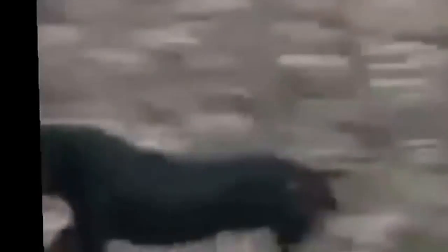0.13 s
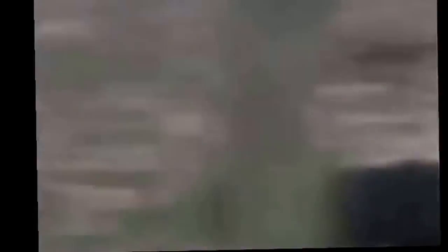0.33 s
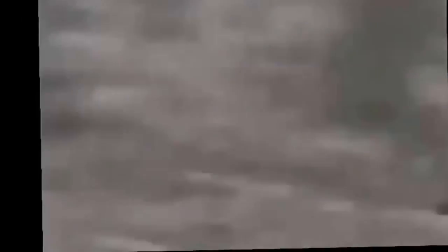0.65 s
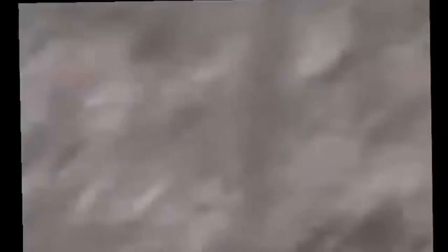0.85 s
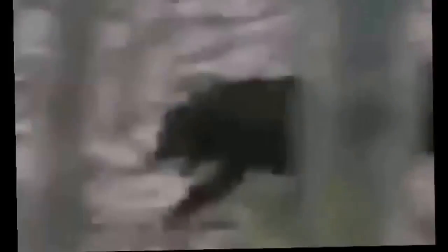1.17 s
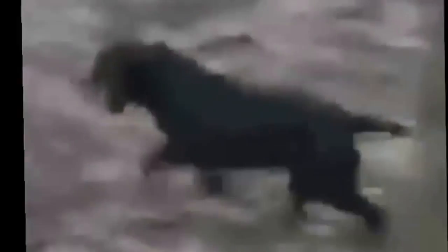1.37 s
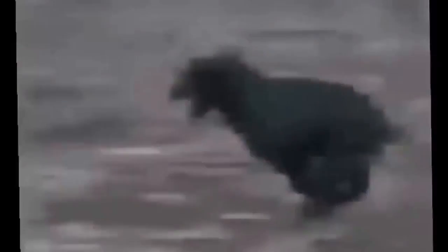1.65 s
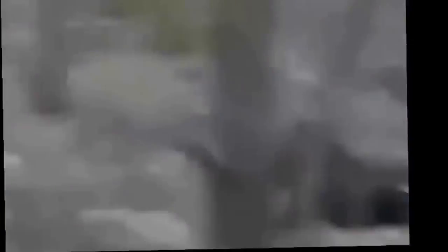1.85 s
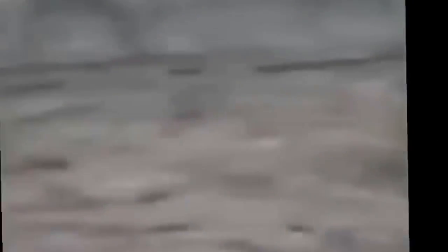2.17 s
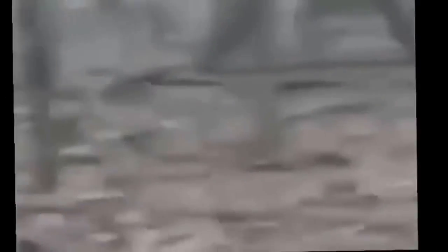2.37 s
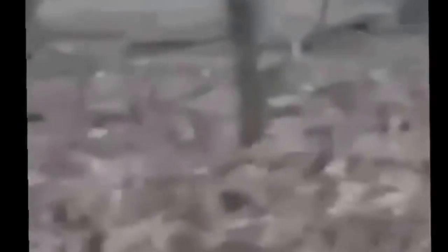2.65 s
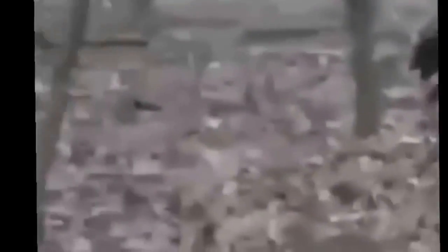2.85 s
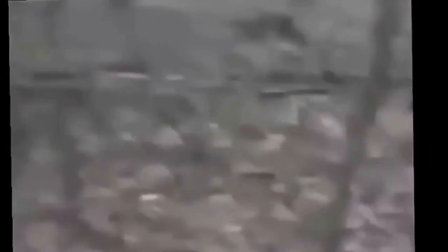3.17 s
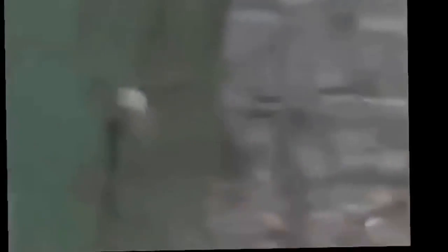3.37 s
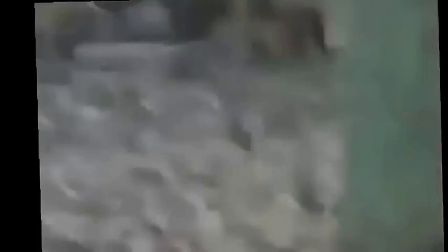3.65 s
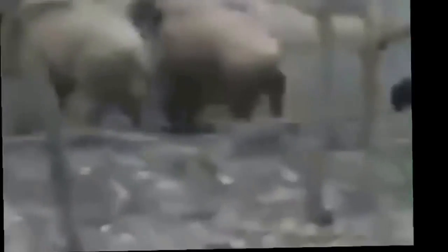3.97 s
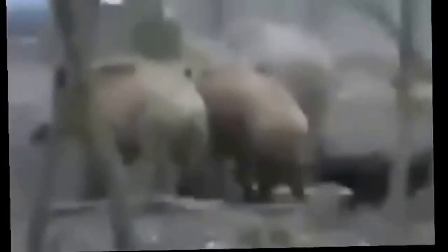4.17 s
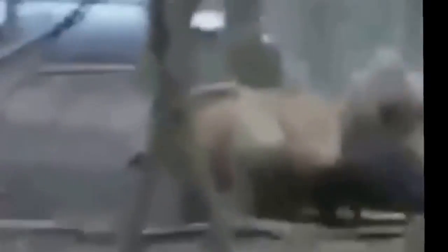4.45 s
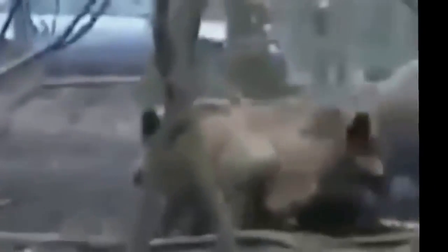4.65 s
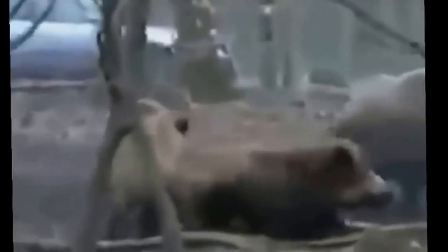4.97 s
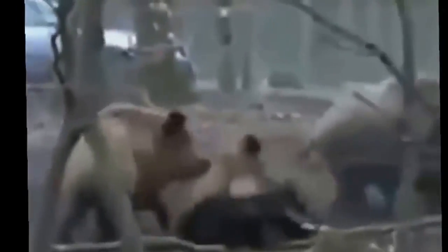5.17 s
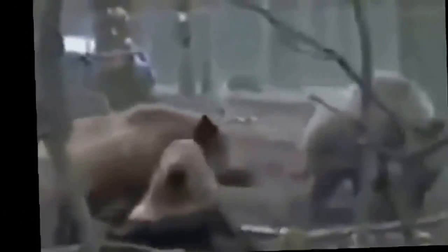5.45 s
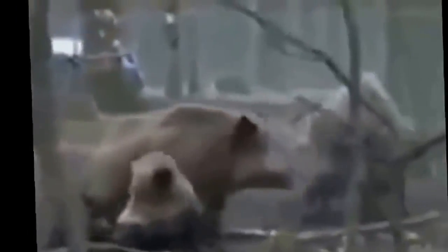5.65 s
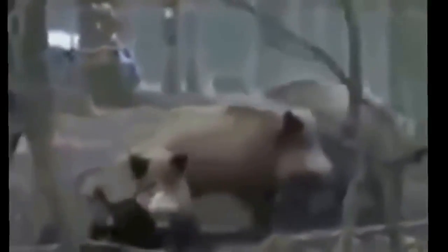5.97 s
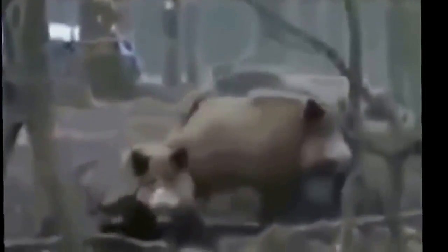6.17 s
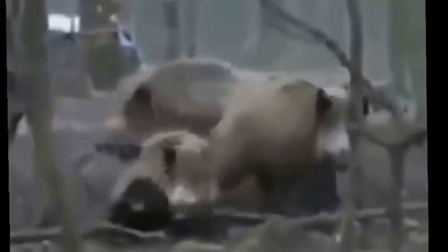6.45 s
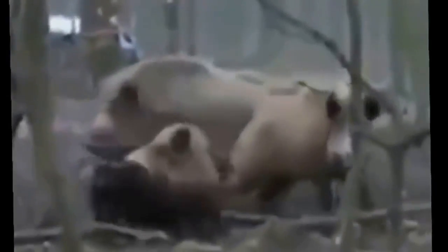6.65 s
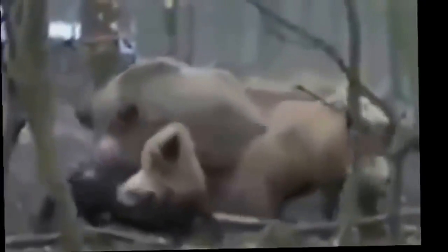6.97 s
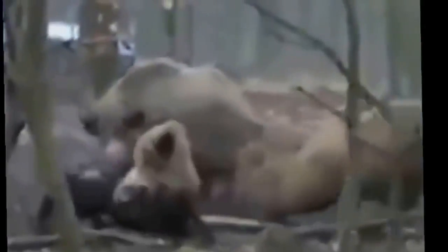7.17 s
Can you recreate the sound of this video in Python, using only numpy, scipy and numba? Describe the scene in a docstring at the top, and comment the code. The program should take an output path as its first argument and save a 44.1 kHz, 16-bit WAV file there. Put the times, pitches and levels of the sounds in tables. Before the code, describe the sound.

Close, rough grunts and sharp barks follow one another quickly as wild boars jostle on dry leaves, over the blurred din of the herd and far, hoarse wails. Midway, distant squeals and more wails echo through the forest, and the near calls thin out briefly. Then a few twigs crack and the grunting and barking grow dense again. The animals are heard from the front, the far ones washed out by the trees.

```python
"""Wild boars run and jostle on dry leaves in a wood.
From the start: near grunts (about 40 throat flaps/s plus fold pulses, ringing throat, mouth and snout),
far hoarse wails, the din of the herd, hooves in the litter. From 0.2 s, hard barks among the flaps.
A twig snaps at 1.2 s. Far squeals at 3-4 s; the wails return at 3.3 s and 5.4 s, washed out by the trees.
Three more twigs snap at 4.8-6 s; grunts and barks go on to the end."""
import sys
import numpy as np
from scipy import signal
from scipy.fft import rfft, irfft
from scipy.io import wavfile
from scipy.ndimage import uniform_filter1d
from numba import njit

SR = 44100
rng = np.random.default_rng(int(sys.argv[2]) if len(sys.argv) > 2 else 0)


def wrap_up_sound(samples):
    """Save the sound to the file named by the first command line argument, as 16-bit audio."""
    columns = np.atleast_2d(samples).T
    # keep every value between -1 and 1, then stretch to whole-number steps
    tamed = np.clip(columns, -1, 1)
    steps = np.round(tamed * 32767).astype(np.int16)
    wavfile.write(sys.argv[1], SR, steps)


N = 322812
TICKS_S = np.arange(0, N / SR, .001)  # clock of the slow controls
CUTOFF_HZ = 6950

# hard barks: t/s, peak/dB, throat re mouth/dB, rasp re mouth/dB, mouth f/Hz, snout f/Hz, rush decay/s
BARKS = [(0.2447, -7.5, -10, -6.5, 1260, 2500, 0.002), (0.527, -19, -6.5, -18.5, 975, 2500, 0.0054),
         (0.796, -10, -16.5, -12, 903, 3140, 0.0057), (.817, -15, -14.5, -14.5, 1099, 2500, 0.0027),
         (.960, -11, -6, 4, 1100, 2220, 0.0052), (1.31, -19.5, -19, -13.5, 986, 2320, 0.0077),
         (1.387, -13.5, -11.5, -6, 1230, 2320, 0.0021), (1.4085, -10.5, -11, -18, 1164, 2280, 0.0031),
         (1.43, -5.5, -38, -18, 1200, 2240, 0.0048), (1.6046, -18.5, -8.5, -14, 722.5, 2050, 0.0072),
         (1.626, -23.5, -13, -25, 728, 2050, 0.00097), (1.8009, -20.5, -6, -27, 1433, 2310, 0.0025),
         (1.829, -16.5, -12, -23.5, 1397, 2240, 0.0058), (2.003, -3.5, -15, -1, 1310, 2290, 0.0046),
         (2.071, -12.5, -11, -7.5, 1408, 3080, 0.004), (2.405, -10, 4.5, 17.5, 1082, 2630, 0.0023),
         (2.45, -19, -19, -12, 955, 3040, 0.0067), (2.4765, -23, -13.5, 0.5, 717.5, 2570, .003),
         (2.658, -16, -13, -26, 1380, 2050, 0.0037), (2.685, -11, -15.5, -1, 1154, 2140, 0.0033),
         (2.801, -19, -10, -15.5, 1100, 2340, 0.0049), (2.826, -17, -11, -4.5, 1050, 2490, 0.0042),
         (2.923, -17, -11, -16, 1100, 2260, 0.011), (3.089, -16.5, -13, -3.5, 1208, 2360, 0.00072),
         (3.1142, -4.5, 0, 17.5, 1246, 2359, 0.0022), (3.286, -8.5, -7, -20, 1205, 1996, 0.002),
         (3.894, -9, -7.5, 4, 1200, 2189, 0.0022), (4.3784, -13, -14.5, -1, 900, 2401, 0.005),
         (4.403, -13.5, -11.5, -3, 1450, 2947, 0.0035), (4.409, -9, -12, -31, 1220, 2780, 0.0051),
         (4.808, -14.5, -2.5, 2, 1546, 2500, 0.0039), (4.83, -5, -9, 0, 1597, 2670, .004),
         (4.849, -14, -11, -11.5, 1485, 2500, 0.0022), (5.068, -11.5, -18.5, -23, 1278, 3190, 0.0051),
         (5.176, -14.5, -8, 0, 1500, 3000, 0.0033), (5.191, -9.5, -3.5, 7.5, 1453, 2150, 0.009),
         (5.2881, 2, -15.5, -7.5, 1582, 3442, 0.0012), (5.3127, -10, -12, -9.5, 1685, 3210, 0.0025),
         (5.332, -13, -13, -13, 1450, 3000, 0.0037), (5.485, -5, -1.5, -36, 1359, 2050, 0.0019),
         (5.729, -9, -35.5, -23, 986, 2213, .002), (5.736, 0.5, -10, 7.5, 1142, 2160, 0.00055),
         (6.041, -12, -5.5, -2, 1030, 3464, 0.0044), (6.085, -9, -8, -23, 850, 2766, 0.0035),
         (6.134, -13.5, -14.5, -6, 1211, 2240, 0.007), (6.2225, -11.5, -12, -15.5, 1392, 2400, 0.0031),
         (6.2406, -8.5, -18.5, -14, 1320, 2260, 0.0065), (6.264, -8.5, -6, -5.5, 1372, 2050, 0.0018),
         (6.283, -13.5, -9, -16, 897, 2320, 0.0069), (6.402, -12.5, -12, 13, 1126, 2220, 0.002),
         (6.6507, -3.5, -13, 8, 1613, 2855, 0.0036), (6.676, -4.5, -5, 7.5, 1235, 2500, 0.002206),
         (6.705, -16, -5, -17, 1157, 2500, .004), (6.833, -10.5, -18, -3.5, 1100, 3158, 0.0095),
         (6.8554, -6.5, -7.5, -15, 1822, 2007, 0.0096), (6.921, -6.5, -9, -20, 1003, 2050, 0.00091),
         (7.1266, -7, -12, -27, 1398, 2480, 0.0033), (7.1754, -1, -13.5, -7, 1412, 2360, 0.00077)]


def from_db(db):
    """Decibels to gain."""
    return 10 ** (np.asarray(db) / 20)


def unit_rms(x):
    """Scale to unit power."""
    return x / np.sqrt(np.mean(x ** 2) + 1e-20)


def steady(x, size=2200):
    """Hold unit power, averaged over a few flaps."""
    power = uniform_filter1d(uniform_filter1d(x * x, size), size // 2)
    return x / np.sqrt(np.maximum(power, 1e-6 * np.mean(x * x)))


def per_sample(times_s, *curves):
    """Interpolate curves to every sample."""
    return [np.interp(np.arange(N) / SR, times_s, curve) for curve in curves]


def drift(rate_hz):
    """Smooth random curve, spread about 1."""
    knots = rng.standard_normal(4000)
    return 1.2 * np.interp(np.arange(N) / SR * rate_hz, np.arange(len(knots)), knots)


def cut(x, hz, kind, order=2):
    """Butterworth filter."""
    return signal.sosfilt(signal.butter(order, hz, kind, fs=SR, output="sos"), x + 1e-18)


def lag(x, decay_s):
    """Give each click an exponential tail."""
    return signal.lfilter([1], [1, -np.exp(-1 / (decay_s * SR))], x + 1e-18)


def colour(x, spectrum):
    """Apply a smooth spectrum with rows f/Hz, gain/dB."""
    hz, db = np.transpose(spectrum)
    bins_hz = np.linspace(1, SR / 2, x.shape[-1] // 2 + 1)
    return irfft(rfft(x) * from_db(np.interp(np.log(bins_hz), np.log(hz), db)), x.shape[-1])


def whiten(x):
    """Flatten the spectrum, keep the phase."""
    return irfft(np.exp(1j * np.angle(rfft(x))))


def resonate(x, hz, width_hz):
    """One resonance, unit peak gain."""
    r = np.exp(-np.pi * width_hz / SR)
    poles = [1, -2 * r * np.cos(2 * np.pi * hz / SR), r * r]
    return signal.lfilter(np.array([1, 0, -1]) * (1 - r * r) / 2, poles, x + 1e-18)


def tract(x, modes):
    """Parallel resonances of alternating sign, rows f/Hz, width/Hz, gain/dB."""
    return sum((-1) ** k * from_db(db) * resonate(x, hz, width_hz)
               for k, (hz, width_hz, db) in enumerate(modes))


@njit
def glide(x, hz, width_hz):
    """Resonance with a moving centre."""
    out, r = np.zeros(len(x)), np.exp(-np.pi * width_hz / SR)
    for i in range(2, len(x)):
        drive = (1 - r * r) / 2 * (x[i] - x[i - 2])
        out[i] = drive + 2 * r * np.cos(2 * np.pi * hz[i] / SR) * out[i - 1] - r * r * out[i - 2]
    return out


def formant(x, hz, width_hz):
    """Three resonances in series, fixed or moving, at steady power."""
    for _ in range(3):
        x = glide(x, hz * np.ones(N), width_hz)
    return steady(x)


def efforts(calls, release_db_per_s, swell_db=16.5, sag_db_per_s=25, fade_in_s=0.01032):
    """Gain of each call per tick: swell, sagging hold, release."""
    start_s, attack_s, hold_s = np.transpose(calls)[:3, :, None]
    past_peak_s = TICKS_S - start_s - attack_s
    db = swell_db * np.clip(past_peak_s / attack_s, -1, 0)
    db -= sag_db_per_s * np.maximum(past_peak_s, 0)
    db -= release_db_per_s * np.maximum(past_peak_s - hold_s, 0)
    return from_db(db) * np.clip((TICKS_S - start_s) / fade_in_s, 0, 1)


def leading(effort, values):
    """Value of the strongest call per tick, blended in overlaps."""
    return np.average(values * np.ones_like(effort), axis=0, weights=effort ** 4 + 1e-30)


def grunt_controls():
    """Effort drives throat, mouth and rasp gains; pitch and mouth resonance slide in each grunt."""
    # grunts: t/s, attack/s, hold/s, throat/dB, mouth/dB, rasp/dB, edge re rasp/dB, clearness/0-1,
    # start pitch/Hz, end pitch/Hz, mouth start f/Hz, mouth end f/Hz
    calls = [ (0, .014, 0.064, -24, -30, -38, -10.5, 0.45, 248.2, 224.2, 866, 985),
             (0.198, 0.04, .018, -15, -26.5, -23, -12.5, 0.84, 250.1, 262.2, 1023, 890),
             (0.35, 0.027, 0.054, -26.5, -24, -34, -2, 0.48, 215.2, 222, 733, 825),
             (.483, 0.03, 0.063, -25, -36.5, -35.5, -6.5, 0.52, 224, 262.3, 920, 880),
             (0.771, 0.019, 0.066, -23.5, -31.5, -35, -16.5, 0.63, 255.6, 226.5, 880, 800),
             (0.899, 0.047, 0.055, -22.5, -26.5, -31.5, -10.5, 0.55, 255, 245, 1255, 1120),
             (0.995, 0.034, 0.086, -23, -28, -31.5, -11.5, 0.45, 280, 230, 896, 650),
             (1.259, 0.031, 0.051, -25.5, -33, -34, -3.5, 0.5, 222, 228.3, 560, 520),
             (1.348, .042, 0.032, -20.5, -24.5, -30.5, -8, 0.81, 230.7, 272, 1160, 1231),
             (1.407, 0.027, 0.022, -20.5, -41.5, -34.5, -7, 0.93, 293, 312.3, 1220, 1103),
             (1.567, 0.036, 0.079, -26, -28, -37, -2, 0.36, 237.4, 225.2, 778, 635),
             (1.684, 0.029, .05, -25.5, -35, -43, -5.5, 0.51, 229.8, 261.7, 850, 999),
             (1.774, 0.029, 0.041, -26, -27, -32.5, -8, 0.54, 290, 234.7, 1240, 700),
             (1.965, 0.0093, .03, -24, -37, -32, -17.5, .9, 351, 320.7, 1334, 1349),
             (1.997, .02, 0.091, -21, -26, -37, -4.5, 0.79, 312, 255.3, 1056, 1325),
             (2.122, .058, .058, -22.5, -30, -35.5, -6.5, 0.7, 245, 223.5, 720, 508.7),
             (2.339, 0.038, .035, -28.5, -38, -34, -9, 0.66, 234.7, 210.5, 1130, 928),
             (2.413, 0.024, .055, -27, -28.5, -34, -4.5, 0.62, 212, 225.3, 857, 561),
             (2.621, 0.034, 0.047, -31, -33, -31.5, -2.5, 0.57, 217.9, 238.8, 1257, 1320),
             (2.706, 0.013, .062, -21, -27, -38, -13.5, .9, 244.1, 234.1, 641.5, 591.4),
             (2.791, 0.018, 0.06, -29.5, -39, -40, -7.5, 0.58, 251, 239.8, 1134, 900),
             (2.88, 0.037, 0.026, -28, -34, -33.5, -13.5, 0.57, 260, 225.7, 1260, 895),
             (3.046, 0.052, 0.019, -26.5, -26, -47, -14.5, 0.5, 255, 250.4, 1130, 1270),
             (3.234, 0.04, 0.069, -26.5, -27, -33.5, -10, 0.44, 264.1, 245.9, 1220, 1090),
             (3.516, 0.036, 0.049, -28.5, -29, -34, -7, .75, 251.6, 256, 985, 956),
             (3.679, .028, 0.045, -27.5, -30.5, -43.5, -11.5, 0.71, 194.6, 215, 713, 800),
             (3.825, 0.022, .066, -24.5, -24.5, -28, -1, .75, 345, 280, 987, 1182),
             (3.925, 0.021, .05, -34.5, -33, -38, -12, 0.59, 264, 231.5, 1030, 891),
             (4.353, 0.035, 0.034, -29, -26.5, -28.5, -9, 0.43, 280.4, 242.6, 803, 1158),
             (4.803, 0.024, 0.033, -25, -23, -31.5, 1.5, 0.53, 352.2, 291.3, 1693, 1426),
             (5.034, .027, 0.022, -27.5, -25, -30, -2, .4, 355, 315.5, 1162, 1361),
             (5.136, 0.035, .069, -26.5, -27.5, -27.5, -4, 0.24, 302.3, 207, 1254, 800),
             (5.277, .016, 0.054, -25, -26, -28.5, -5, 0.38, 349.7, 308.4, 1560, 1389),
             (5.425, 0.039, 0.055, -21.5, -23, -28, -3.5, 0.61, 317.3, 326.3, 1065, 1106),
             (5.677, 0.046, .006, -27, -23, -32.5, -14, 0.33, 246.7, 283.6, 1160, 987),
             (5.79, .049, 0.022, -23, -24.5, -34.5, 9, 0.8, 270, 285.5, 1022, 979),
             (5.928, 0.049, .04, -30, -34, -54, -6, 0.37, 219.4, 325, 870, 895),
             (6.031, .043, .085, -28, -29, -29.5, -2, 0.4, 335, 279.2, 853, 978),
             (6.187, .054, .07, -26.5, -24.5, -26.5, -4, 0.28, 351, 270.3, 1332, 1001),
             (6.314, 0.033, .12, -30.5, -38, -32.5, -5, 0.57, 224, 247, 906, 1159),
             (6.539, .02, 0.056, -26, -30.5, -44.5, -15, .5, 198.3, 195.7, 850, 700),
             (6.64, .038, .029, -25.5, -27, -33, -3, 0.53, 326.3, 317.8, 1604, 1050),
             (6.768, 0.04, 0.092, -26.5, -25, -28, -1, 0.59, 328.2, 286.8, 685, 843),
             (7.003, .036, .047, -32, -40, -39.5, -27.5, 0.3, 239.7, 224, 1596, 1458),
             (7.09, 0.072, 0.015, -22.5, -24.5, -28, -8, 0.46, 291.2, 346.4, 1210, 1321)]
    columns = np.transpose(calls)[:, :, None]
    start_s, attack_s, hold_s, throat_db, mouth_db, rasp_db, edge_db, clear = columns[:8]
    pitch_start_hz, pitch_end_hz, mouth_start_hz, mouth_end_hz = columns[8:]
    effort = efforts(calls, release_db_per_s=430)
    progress = np.clip((TICKS_S - start_s) / (attack_s + hold_s), 0, 1)
    pitch_hz = pitch_start_hz + (pitch_end_hz - pitch_start_hz) * progress
    mouth_hz = mouth_start_hz + (mouth_end_hz - mouth_start_hz) * progress
    gains = [np.sum(effort * from_db(db), axis=0) for db in (throat_db, mouth_db, rasp_db)]
    timbre = [leading(effort, values) for values in (edge_db, clear, pitch_hz, mouth_hz)]
    return per_sample(TICKS_S, *gains, *timbre)


def flaps(rate_hz, jitter, spread_db):
    """Uneven slow clicks of the throat, in step with the barks."""
    anchors_s = np.array([-.01] + sorted(row[0] for row in BARKS) + [N / SR])
    times_s = np.concatenate([np.linspace(a, b, max(round((b - a) * rate_hz), 1), endpoint=False)
                              for a, b in zip(anchors_s, anchors_s[1:])])
    shift, strength = rng.standard_normal((600, 2))[:len(times_s)].T
    times_s += jitter / rate_hz * shift * ~np.isin(times_s, anchors_s)
    clicks = np.zeros(N)
    clicks[np.clip((times_s * SR).astype(int), 0, N - 1)] = from_db(spread_db * strength)
    return clicks


def puffs(clicks, rise_s, decay_s, air, leak):
    """Each flap is a slap plus a puff of turbulence; some air leaks in between."""
    opening = lag(lag(clicks, decay_s), rise_s)
    turbulence = unit_rms(opening * rng.standard_normal(N))
    return unit_rms(clicks) + air * turbulence + leak * rng.standard_normal(N)


def vocal_folds(clicks, pitch_hz, rough, jitter=0.07084, overtone_db=-21.5):
    """Hum and pulses; the rougher the grunt, the more each flap swells them and jolts the pitch."""
    swell = cut(lag(clicks, decay_s=0.015), 73, "low")
    swell = swell / np.mean(swell) - 1
    cycles = np.cumsum(pitch_hz * (1 + rough * (jitter * drift(130) + 0.06 * swell))) / SR
    strength = 1 + rough * swell
    hum = np.sin(2 * np.pi * cycles) + from_db(overtone_db) * np.sin(4 * np.pi * cycles)
    pulses = np.diff(np.floor(cycles), prepend=0)
    return steady(strength * hum), steady(strength * pulses)


def grunts():
    """Flaps and fold pulses ring the deep throat, the moving mouth cavity and the snout."""
    # snout and jaw resonances: f/Hz, width/Hz, gain/dB
    snout_modes = [(2250, 400, 0), (2750, 450, -5)]
    throat_gain, mouth_gain, rasp_gain, edge_db, clear, pitch_hz, mouth_hz = grunt_controls()
    clear = np.clip(clear, 0, 1)
    rough = np.sqrt(1 - clear)
    clicks = flaps(rate_hz=43, jitter=0.19, spread_db=2)
    soft = puffs(clicks, rise_s=0.0011, decay_s=0.0092, air=0.44, leak=0.76)
    harsh = puffs(clicks, rise_s=0.001, decay_s=0.0045, air=2.2, leak=0.8)
    hum, pulses = vocal_folds(clicks, pitch_hz, rough)

    ring = steady(glide(glide(soft, pitch_hz, 54), pitch_hz, 70))
    chest = steady(cut(glide(soft, 0.728 * pitch_hz, 49), 200, "low", order=3))
    throat = from_db(-4.4) * np.sqrt(clear) * hum + rough * (from_db(-2) * ring + from_db(-5) * chest)
    throat = cut(throat, 480, "low", order=4)

    # the folds chop the airflow at the pitch of the hum
    harsh = unit_rms(harsh * np.maximum(1 + 0.36 * hum, 0))
    voiced_share = 0.7 * clear ** 2
    source = np.sqrt(voiced_share) * pulses + np.sqrt(1 - voiced_share) * harsh
    vowel = formant(source, mouth_hz, 300) + from_db(-5) * formant(source, 1.324 * mouth_hz, 280)
    pharynx = from_db(-6) * formant(source, 622, 440)
    mouth = steady(cut(vowel + pharynx, 300, "high", order=3))

    edge = from_db(edge_db) * formant(harsh, 3320, 820)  # brightness of a tight throat
    rasp = cut(unit_rms(tract(harsh, snout_modes)) + edge, 3850, "low", order=6)
    rasp = steady(cut(rasp, 1600, "high", order=3))
    return throat_gain * throat + from_db(-3.5) * (mouth_gain * mouth + rasp_gain * rasp)


def nasal(x):
    """Nasal side cavities swallow narrow bands of the near voices."""
    # antiresonances: f/Hz, width/Hz
    dips = [(435, 28), (1900, 7.1), (4400, 82)]
    for hz, width_hz in dips:
        x = x - resonate(x, hz, width_hz)
    return x


def wails(jitter=0.045, wander=0.012, waver_db=3):
    """A wavering tone under hoarse air in narrow throat resonances."""
    # far wails: t/s, attack/s, hold/s, hoarse/dB, tone/dB, mouth f/Hz, pitch/Hz
    calls = [(0.0, 0.0083, 0.066, -38, -45, 1076, 572), (0.175, 0.014, 0.14, -29, -38, 948, 580),
             (0.339, 0.031, 0.11, -36, -46.5, 1012, 565), (0.508, 0.074, 0.17, -44, -45, 1030, 577),
             (3.314, 0.047, 0.24, -27, -37.5, 1061, 590), (3.67, 0.086, 0.3648, -28, -48.5, 1033, 595),
             (5.437, 0.054, 0.13, -27.5, -35.5, 1000, 578), (5.77, 0.081, 0.12, -31.5, -40, 1013, 568)]
    # throat resonances: f/Hz, width/Hz, gain/dB
    throat_modes = [(622, 25, -14), (1030, 44, -7.5), (1610, 230, -17.5), (2050, 180, -18),
                    (2220, 35, -16.5)]
    *_, hoarse_db, tone_db, mouths_hz, pitches_hz = np.transpose(calls)
    effort = efforts(calls, release_db_per_s=124)
    hoarse_gain, tone_gain = per_sample(TICKS_S, from_db(hoarse_db) @ effort, from_db(tone_db) @ effort)
    mouth_hz, pitch_hz = per_sample(TICKS_S, leading(effort, mouths_hz[:, None]),
                                    leading(effort, pitches_hz[:, None]))
    cycles = np.cumsum(pitch_hz * (1 + jitter * drift(160) + wander * drift(14))) / SR
    tone = np.sqrt(2) * np.sin(2 * np.pi * cycles)
    throat = tract(rng.standard_normal(N), throat_modes)
    mouth = glide(rng.standard_normal(N), mouth_hz * (1 + 2 * wander * drift(8.7)), 60)
    hoarse = steady(cut(cut(throat + from_db(-9.5) * mouth, 640, "high"), 3900, "low"))
    return from_db(-1) * hoarse_gain * hoarse + from_db(1 + waver_db * drift(35)) * tone_gain * tone


def herd():
    """The distant herd blurs into a noise that swells and sinks."""
    # din envelope: t/s, level/dB
    envelope = [(0.0, -16.5), (0.16, -21.5), (0.67, -31), (1.0, -17.5), (1.14, -27.5), (2.0, -29),
                (2.49, -35.5), (3.12, -26), (3.28, -31.5), (3.77, -23), (4.2, -31), (4.83, -35.5),
                (5.02, -24.5), (5.42, -24), (6.12, -18), (6.38, -28.5), (6.85, -22), (7.32, -33.5)]
    # din spectrum: f/Hz, level/dB
    spectrum = [(30, -14.5), (70, -5), (140, -3), (260, 4), (420, -3), (600, 1), (800, -5), (1050, 0.5),
                (1500, -5.5), (2100, -8), (3100, -12), (4500, -22), (7000, -51.5)]
    level_db, = per_sample(*np.transpose(envelope))
    return from_db(level_db - 10) * unit_rms(colour(rng.standard_normal(N), spectrum))


def leaves(crackles_per_s=2000, spread_db=-1.3, hiss=0.037):
    """Dry leaves crumple in clumps of tiny cracks, louder under each heavy hoof."""
    # hooves stirring the litter: t/s, level/dB
    rustle = [(0.0, -49), (0.12, -48.5), (0.96, -43), (1.38, -51), (2.0, -49), (2.24, -53.5), (3.28, -53.5),
              (3.48, -54.5), (3.75, -56), (3.94, -50.5), (4.67, -54), (4.89, -55), (5.16, -44),
              (5.42, -51.5), (5.67, -50), (6.18, -43.5), (6.46, -49), (7.32, -49)]
    # hooves crushing leaves: t/s, level/dB, decay/s
    crunches = [(0.518, -37, 0.014), (0.924, -35, 0.032), (0.943, -26.5, 0.015), (1.08, -39, 0.029),
                (3.848, -33.5, 0.029), (5.993, -37.5, 0.031), (6.318, -31, 0.014)]
    # crackle spectrum: f/Hz, level/dB
    spectrum = [(500, -8.5), (1200, -41), (2500, 0.5), (3400, -1.5), (4300, -1.5), (5500, -1.5),
                (6800, -5.5)]
    t = np.arange(N) / SR
    rustle_db, = per_sample(*np.transpose(rustle))
    gain = from_db(rustle_db)
    for start_s, db, decay_s in crunches:
        age_s = t - start_s
        gain += from_db(db) * np.clip(age_s / 0.01, 0, 1) * np.exp(-np.abs(age_s) / decay_s)
    sizes = from_db(spread_db * np.minimum(rng.exponential(1, N), 4)) * rng.choice([-1, 1], N)
    cracks = rng.random(N) < crackles_per_s * from_db(3 * drift(40)) / SR
    grains = unit_rms(sizes * cracks) + hiss * rng.standard_normal(N)
    return gain * unit_rms(cut(colour(grains, spectrum), CUTOFF_HZ, "low", order=6))


def barks(swell_s=0.0012, air=0.16, size=3000, lead=500):
    """The throat slaps open and rings the cavities; a short air rush snaps, a longer one barks."""
    # narrow cavities that ring on: f/mouth f, width/Hz, gain/dB
    rings = [(.79, 110, 2.5), (0.998, 112, 2.5), (1.27, 135, -7)]
    out, t = np.zeros(N + size), (np.arange(size) - lead) / SR
    *_, throat_hz, _ = grunt_controls()
    for time_s, peak_db, throat_db, rasp_db, mouth_hz, snout_hz, rush_s in BARKS:
        at = int(time_s * SR)
        rush = rng.standard_normal(size) * np.exp(-np.abs(t) / np.where(t < 0, swell_s, rush_s))
        slap = air * rush - (t == 0)
        throat = resonate(resonate(slap, throat_hz[at], 300), throat_hz[at], 530)
        mouth = cut(resonate(resonate(slap, mouth_hz, 230), mouth_hz, 940), 4600, "low")
        ring = tract(slap, [(ratio * mouth_hz, width_hz, db) for ratio, width_hz, db in rings])
        rasp = cut(resonate(resonate(slap, snout_hz, 900), snout_hz, 3300), 3630, "low", order=6)
        bark = unit_rms(unit_rms(mouth) + from_db(-8.5) * unit_rms(ring))
        bark += from_db(throat_db + 6.5) * unit_rms(throat) + from_db(rasp_db - 2.5) * unit_rms(rasp)
        out[at - lead:at - lead + size] += from_db(peak_db) * bark / np.abs(bark).max()
    return out[:N]


def twigs(decay_s=0.002, size=2000):
    """A dry twig parts: a sharp crack over a woody knock."""
    # snaps: t/s, level/dB, ring f/Hz, knock re crack/dB
    snaps = [(1.187, -23.5, 4090, -8.5), (4.784, -15, 4300, -13.5), (4.978, -11.5, 5900, 3),
             (5.998, -10.5, 5600, 2.5)]
    out = np.zeros(N + size)
    for time_s, level_db, ring_hz, knock_db in snaps:
        at = int(time_s * SR)
        burst = rng.standard_normal(size) * np.exp(-np.arange(size) / SR / decay_s)
        knock = cut(tract(burst, [(700, 220, 0), (1050, 280, 0), (1590, 320, -2)]), 2200, "low")
        crack = cut(resonate(burst, ring_hz, 1900), CUTOFF_HZ, "low", order=6)
        snap = unit_rms(crack) + from_db(knock_db) * unit_rms(knock)
        out[at:at + size] += from_db(level_db) * snap / np.abs(snap).max()
    return out[:N]


def squeals(jitter=0.032, air=0.35, bend=0.044):
    """Shaky pulses ring a strained throat; the pitch drops as the effort fades."""
    # far squeals: t/s, attack/s, hold/s, level/dB, pitch/Hz
    calls = [(3.032, 0.042, 0.0097, -21.5, 608.4), (3.125, 0.07, 0.14, -29.5, 624),
             (3.683, 0.036, 0.031, -24.5, 388.3), (3.824, 0.054, 0.015, -30, 411.8)]
    # throat resonances: f/Hz, width/Hz, gain/dB
    throat_modes = [(800, 110, 6.5), (1220, 390, 2), (2067, 70, 10), (2500, 900, -7.5)]
    *_, level_db, top_hz = np.transpose(calls)
    effort = efforts(calls, release_db_per_s=171)
    bent_hz = top_hz[:, None] * (1 - bend * (1 - effort))
    gain, pitch_hz = per_sample(TICKS_S, from_db(level_db) @ effort, leading(effort, bent_hz))
    cycles = np.cumsum(pitch_hz * (1 + jitter * drift(170))) / SR
    pulses = unit_rms(np.diff(np.floor(cycles), prepend=0))
    voice = tract(pulses + air * rng.standard_normal(N), throat_modes)
    return gain * steady(cut(cut(voice, 430, "high"), 3100, "low"))


def wood(x, t60_s=1.85, early_s=0.019, early_db=19):
    """Quick echoes from ground and near trunks, then a long thin scatter from the trees."""
    # echo spectrum: f/Hz, level/dB
    spectrum = [(100, -12), (250, -12.5), (500, -2.5), (1100, -6.5), (2500, -6.5), (4000, -2), (7000, -1)]
    t = np.arange(2 * SR) / SR
    decay = from_db(-60 * t / t60_s) + from_db(early_db) * np.exp(-t / early_s)
    onset = np.clip(t / 0.0092, 0, 1)
    # so many trunks scatter that no single frequency stands out
    echo = colour(whiten(rng.standard_normal(len(t)) * decay * onset), spectrum)
    mid_band = np.abs(rfft(echo))[1400:4000]  # 700-2000 Hz
    return signal.fftconvolve(x, echo / np.sqrt(np.mean(mid_band ** 2)))[:N]


def widen(x, scatter_s=0.0027):
    """Short scatter from the sides reaches left and right with opposite signs."""
    # stereo width: f/Hz, side re middle/dB
    spectrum = [(60, -17), (150, -28), (300, -26), (600, -22), (1500, -20.5), (3000, -19.5), (6000, -15)]
    t = np.arange(SR // 4) / SR
    echo = whiten(rng.standard_normal(len(t)) * t * np.exp(-t / scatter_s))
    side = colour(signal.fftconvolve(x, echo)[:N], spectrum)
    return x + side * np.array([[1], [-1]])


def scene():
    """Near and far animals, all straight ahead, in the scatter of the wood."""
    near = nasal(grunts())
    snaps = nasal(barks()) + from_db(-3.5) * twigs()
    far = from_db(-1) * (from_db(-2.5) * squeals() + wails())
    din = herd()
    litter = from_db(6.5) * leaves()
    echoes = wood(from_db(-4) * near + from_db(-7.5) * snaps + far)
    return widen(near + snaps + far + din + litter + echoes)


def record(dry):
    """Round the peaks, cut the treble steeply."""
    rounded = 0.95 * np.tanh(dry / 0.95)
    return signal.sosfilt(signal.ellip(12, 0.2, 75, CUTOFF_HZ, fs=SR, output="sos"), rounded)


dry = scene()
out = record(dry)
wrap_up_sound(out)
```